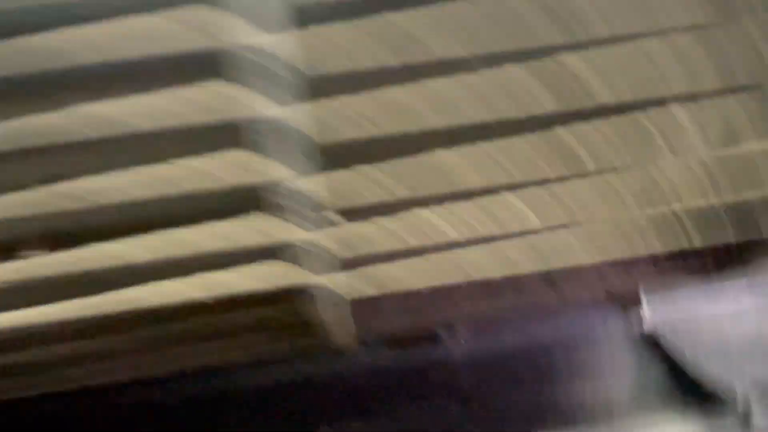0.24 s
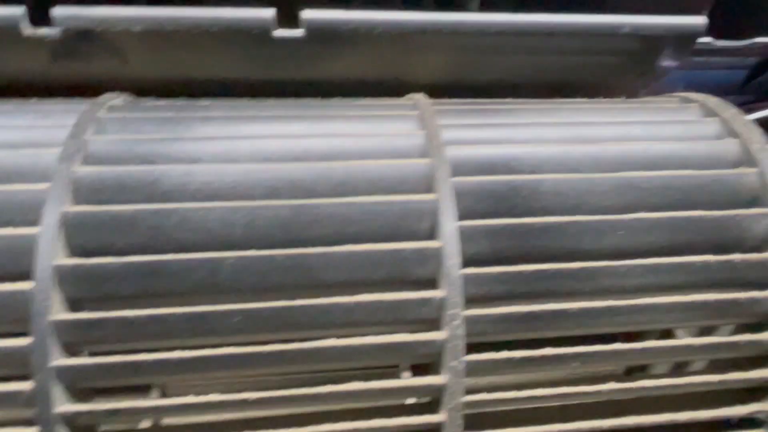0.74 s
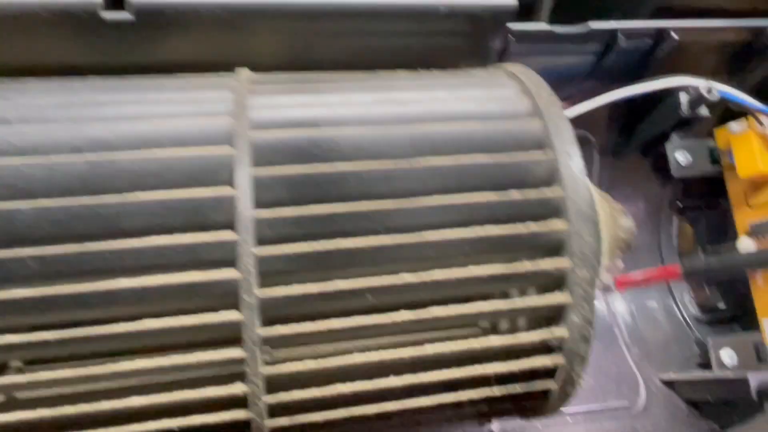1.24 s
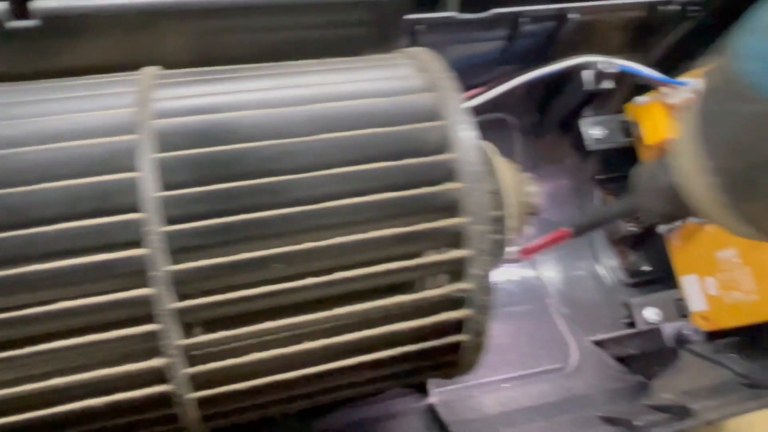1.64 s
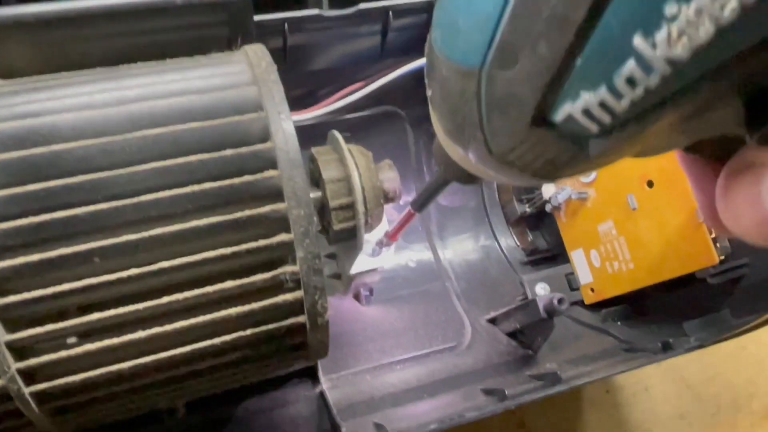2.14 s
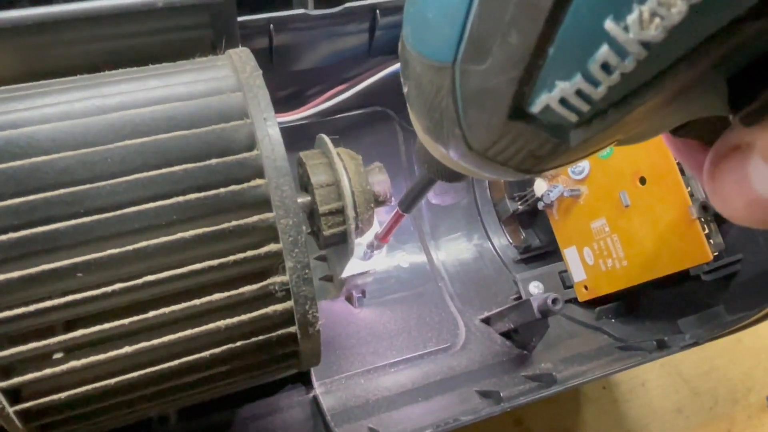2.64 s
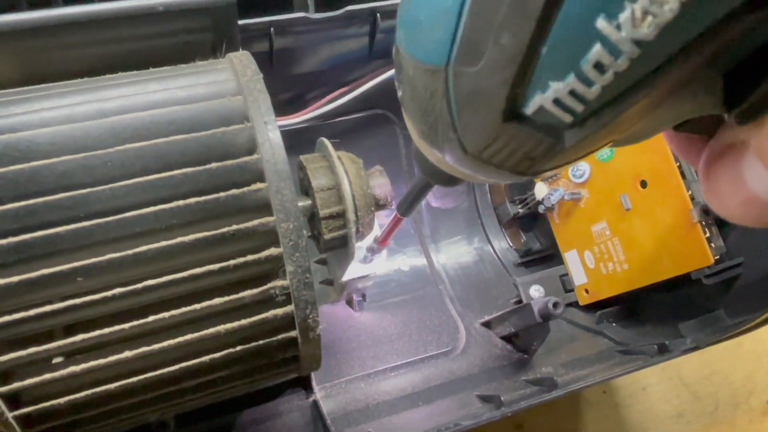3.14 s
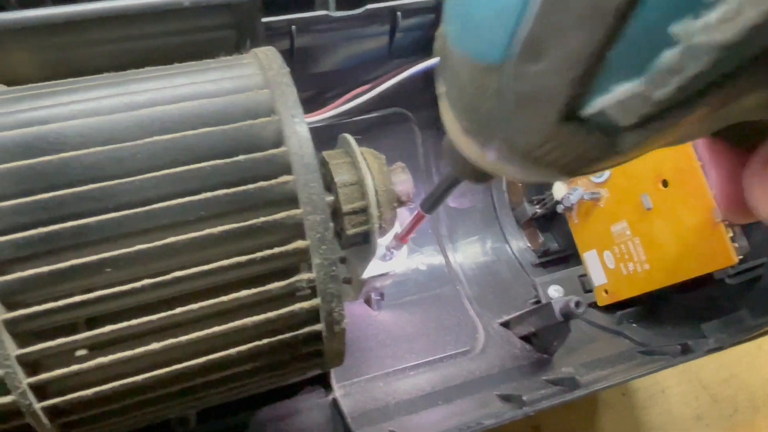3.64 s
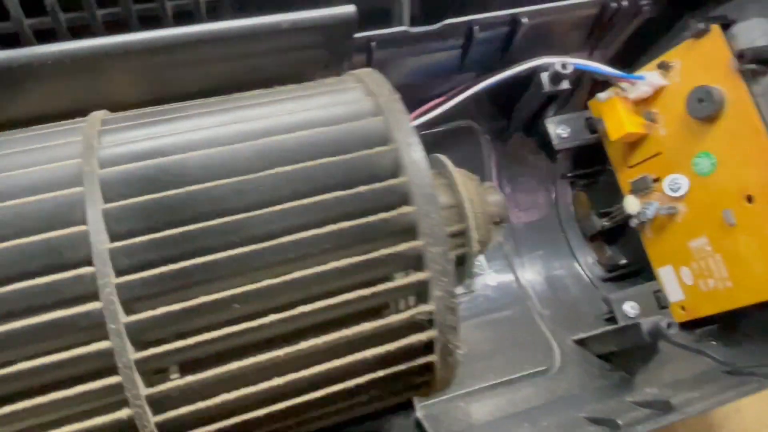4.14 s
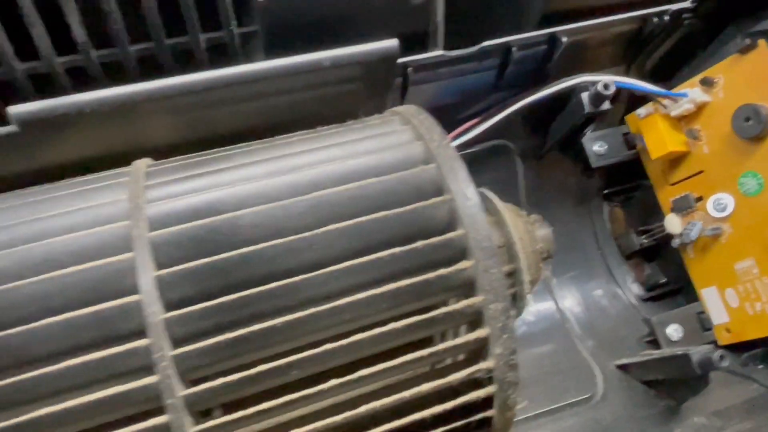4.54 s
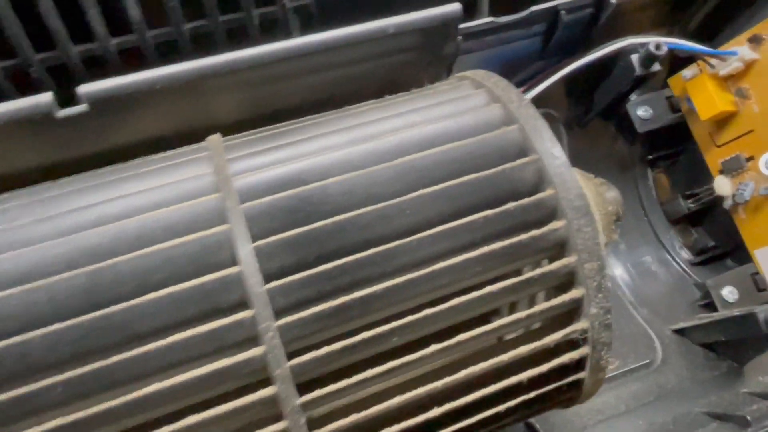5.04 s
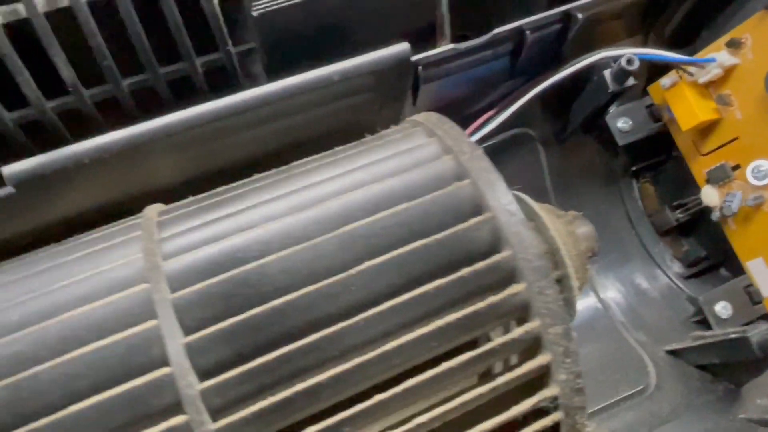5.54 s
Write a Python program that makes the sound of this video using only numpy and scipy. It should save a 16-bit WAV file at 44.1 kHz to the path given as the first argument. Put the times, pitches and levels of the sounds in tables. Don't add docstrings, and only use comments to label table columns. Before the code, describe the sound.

Small plastic taps, a half-second electric screwdriver whir with a sharp snap, then heavy clattering thuds as the tool is put down.

```python
import sys
import numpy as np
from scipy import signal
from scipy.fft import rfft, irfft, next_fast_len
from scipy.io import wavfile
from scipy.ndimage import uniform_filter1d, map_coordinates

SR = 44100
rng = np.random.default_rng(int(sys.argv[2]) if len(sys.argv) > 2 else 0)


def level_to_linear(level):
    exponent = np.asarray(level, float) / 20
    return 10 ** exponent


def transcribe(signal):
    frames = np.atleast_2d(signal).T
    limited = np.clip(frames, -1, 1)
    pcm = np.round(limited * 32767).astype(np.int16)
    wavfile.write(sys.argv[1], SR, pcm)


N = 255912

# [t/s, peak level/dB, hollow level/dB, bright level/dB]
TAPS = [(1.0384, -31, 0, -10.5), (1.0518, -29, 5.5, 0), (1.0797, -27, -7, 2.5), (1.14, -49, 10.5, -32),
        (1.1955, -42, -6, -2), (1.266, -37, -10, 4), (1.3039, -45, -1.5, -5), (1.3324, -35.5, 11.5, -13.5),
        (1.3544, -42.5, 12, -7), (1.4474, -51, 14.5, -27), (1.4552, -41.5, 5, -5), (1.494, -34.5, 14, -3),
        (1.511, -20.5, 4, 0), (1.5588, -39.5, 12.5, -2.5), (1.5973, -52.5, 17.5, -10),
        (1.6761, -67, 20, -12), (1.6911, -61.5, 20, -16)]
# [t/s, peak level/dB, hollow level/dB, bright level/dB]
SEATING = [(1.9005, -60.5, 14, 11), (1.992, -53.5, 14.5, -1), (2.4885, -75, 28, -6), (2.5133, -54, 10, -1),
           (2.5416, -54.5, 13, -8), (2.5907, -58, 12.5, -11), (2.6622, -51, 11.5, -6),
           (2.7144, -64.5, 17.5, -5), (2.8054, -58.5, 17, -12), (2.814, -42, 3.5, 1.5),
           (2.9553, -49, 2.5, 1), (2.9818, -30, 6.5, -13), (2.9926, -27, 5.5, 9)]
# [t/s, peak level/dB, hollow level/dB, bright level/dB]
JERKS = [
    (3.1537, -34, 11, 0),
    (3.1976, -41, 4, -6),
    (3.3187, -26, -8, -16),
]
# [t/s, peak level/dB, hollow level/dB, bright level/dB]
SNAPS = [
    (3.1925, -13, -3, 5.5),
    (3.439, -46, -2, 6),
]
# [t/s, peak level/dB, hollow level/dB, bright level/dB]
SKIPS = [
    (3.0263, -23.5, 3, -9),
    (3.119, -35, 0, -4),
    (3.16, -34, 1, 0),
    (3.171, -25, 12, 5),
    (3.204, -30, 0, 8),
    (3.269, -21.5, 5, 2.5),
    (3.338, -21, 1, 7),
]
# [t/s, peak level/dB, hollow level/dB, bright level/dB]
WITHDRAWAL = [(3.569, -50.5, 7, -4), (3.616, -51, 1, 3), (3.6274, -40, 10.5, 6), (3.6385, -33, -16, -3),
              (3.6605, -37.5, -1, 0), (3.693, -44, 12, 15), (3.703, -43, 12, -15), (3.7194, -47, 18.5, 5),
              (3.7514, -45.5, 16.5, -26), (3.9828, -51, 9, 1)]
# [t/s, peak level/dB, hollow level/dB, bright level/dB]
CLACKS = [(4.47, -20, 13.5, -1.5), (4.4817, -11.5, 9, -8), (4.4944, -15.5, -18, -5),
          (4.5144, -31.5, 13, -33), (4.6623, -42.5, 13.5, -27), (4.7762, -49, 25, -35),
          (4.7831, -22, 8, -16.5), (5.019, -15.5, 7.5, -4), (5.049, -27, 4, -9), (5.0665, -32, 6, -25),
          (5.0973, -19.5, 14.5, -2), (5.1077, -23, 18.5, -10), (5.1452, -16.5, 14.5, -3),
          (5.179, -41, 3, -14), (5.2125, -44.5, 24, -13)]
# [t/s, peak level/dB, hollow level/dB, bright level/dB]
BUZZ = [
    (4.786, -24.5, 3.5, -34),
    (5.11, -22, -23, -19),
]
# [f/Hz, width/Hz, level/dB]
HOUSING = [(655, 28, -1.5), (965, 76, 4.5), (1309, 58, 2.5), (2140, 1300, -7), (2654, 33, 3.5),
           (3270, 91, 4.5), (4710, 760, -3), (5427, 87, 12.5), (5870, 230, 1)]
# [f/Hz, width/Hz, level/dB]
TOOL = [(730, 210, 1.5), (1018, 39, 7.5), (1420, 130, 7), (2316, 350, -2), (2680, 206, -23), (3310, 790, 6),
        (5400, 1350, 8.5), (6600, 220, 4)]
# (t60/s, panel f/Hz)
WALL, SCREW_HEAD, THREAD = (0.029, 2910), (0.023, 2160), (0.089, 1860)
RIM, CATCH = (0.017, 2560), (0.015, 4000)
BENCH, BATTERY = (0.022, 1465), (0.016, 2010)

# [t/s, peak level/dB, ring f/Hz]
TICKS = [(1.14, -44, 2500), (1.2654, -32, 3400), (1.2658, -28.5, 5240), (1.333, -47, 3373),
         (1.447, -49, 2800), (1.516, -19, 1286), (2.542, -51.5, 2070), (3.154, -20.5, 2130),
         (3.1915, -21.5, 3630), (3.571, -45, 885), (3.618, -35, 4930), (3.642, -30.5, 2930),
         (3.66, -34, 2800), (3.705, -42, 2900), (4.705, -46, 2100), (5.035, -33, 3200),
         (5.051, -22.5, 2430), (5.066, -34, 3200), (5.106, -28, 5500), (5.124, -35, 2800),
         (5.136, -35, 2800), (5.178, -46, 4250), (5.208, -51, 4000), (5.229, -40.5, 3470),
         (5.621, -53, 5040), (3.1595, -35, 1080), (3.17, -24, 1090), (3.193, -22.5, 1280),
         (3.2, -21.5, 780), (5.2145, -31.5, 1540), (1.676, -46, 813), (3.627, -34.5, 688),
         (3.641, -35.5, 700), (3.721, -40, 990), (3.752, -33, 648), (5.391, -46.5, 1150),
         (5.445, -53, 1050), (5.472, -48, 1050), (5.66, -47.5, 1390)]
# [t/s, length/s, level/dB, dull above f/Hz]
SCRAPES = [(1.047, 0.075, -44, 1500), (1.071, 0.036, -51, 6000), (1.215, 0.013, -45.5, 3500),
           (1.341, 0.044, -46, 1600), (1.452, 0.051, -46, 3000), (1.515, 0.078, -36, 1600),
           (1.673, 0.022, -40.5, 1180), (3.549, 0.023, -45.5, 1280), (3.609, 0.053, -36, 2470),
           (3.694, 0.05, -34, 1490), (3.736, 0.036, -51, 1300), (4.474, 0.12, -34.5, 2330),
           (4.77, 0.025, -35, 1500), (4.798, .13, -44, 2560), (5.028, 0.05, -24, 2000),
           (5.126, 0.039, -29, 1200), (5.151, 0.07, -27, 1200), (5.209, 0.037, -29.5, 1520),
           (5.01, 0.016, -34, 1200), (1.32, .012, -52, 3000)]
# [t/s, peak level/dB, f/Hz, t60/s]
RINGS = [(1.056, -37.5, 178, 0.3), (1.055, -37, 956, 0.1), (1.057, -44, 1283, 0.065),
         (1.27, -57, 202, 0.075), (1.336, -47, 916, 0.11), (1.365, -50.5, 191, 0.18),
         (1.497, -32.5, 940, 0.09), (1.515, -40, 662, 0.12), (1.518, -44, 1010, 0.17),
         (1.56, -55, 984, 0.086), (1.685, -47, 708, 0.077), (4.452, -48.5, 940, 0.082),
         (4.48, -19.5, 1464, 0.049), (4.5, -26, 419, 0.16), (4.765, -36.5, 400, .08),
         (4.787, -25.5, 2145, 0.032), (4.885, -39, 401, 0.24), (5.022, -22, 816, 0.073),
         (5.021, -21, 630, 0.067), (5.06, -37, 1670, 0.057), (5.145, -23, 1525, 0.044),
         (5.222, -24, 443, 0.031), (5.308, -45, 198, .06), (5.445, -37.5, 308, 0.069),
         (5.46, -38.5, 402, 0.048), (4.494, -25, 149.5, 0.1), (5.564, -40, 378, 0.074),
         (5.662, -34.5, 420, 0.038), (5.71, -36.5, 194, 0.064), (4.81, -51, 2080, 0.26),
         (4.815, -53, 2370, .15)]

# [t/s, shaft f/Hz, gear load level/dB]
MOTOR = [
    (3.0, 203.5, -43.5),
    (3.036, 197.7, -39),
    (3.09, 192.4, -35),
    (3.15, 183.7, -30),
    (3.175, 180.2, -34.5),
    (3.21, 185.3, -35),
    (3.262, 192, -34.5),
    (3.32, 194.7, -31.5),
    (3.385, 199.6, -32.5),
]
SHAFT_ORDERS = [1, 1.3, 2, 3, 4, 4.5, 5, 5.5, 6, 7, 11]
# [mid level/dB, side level/dB]
ORDER_LEVELS = [(-7.5, -4.5), (-13, -24), (3.5, -3.5), (-9.5, 1), (-4.5, -3), (-16, -18), (-1.5, -14),
                (-16, -16), (0, -18), (-10.5, -8), (-2, -23)]
# [f/Hz, width/Hz, level/dB]
GEARS = [(770, 103, 0), (1085, 310, -1), (1600, 125, -2.5), (2104, 186, 2.5), (2800, 144, 1)]
# [f/Hz, level/dB per Hz]
BRUSHES = [(2500, -14), (4200, 3), (5000, -4.5), (6500, -11.5), (9500, -6), (13000, -25), (13500, -34),
           (15900, -44)]

# [t/s, peak level/dB, f/Hz]
HAND_KNOCKS = [(2.22, -53.5, 168), (3.63, -42, 640), (3.712, -42, 172), (3.76, -37, 629), (4.47, -18, 416),
               (4.489, -14, 432), (4.662, -24.5, 310), (4.688, -30, 380), (4.704, -24.5, 360),
               (4.784, -15, 357), (5.019, -4.5, 394.5), (5.031, -16.5, 387), (5.097, -14, 445),
               (5.179, -28.5, 214), (5.325, -28, 257), (5.391, -24.5, 403), (5.549, -36, 230),
               (5.659, -31, 294)]
# [t/s, peak level/dB, f/Hz]
FREE_KNOCKS = [
    (1.059, -35.5, 174.4),
    (4.82, -38.5, 424.6),
    (5.115, -19, 408.6),
    (5.142, -15.5, 417),
    (5.21, -23, 382.7),
    (5.613, -45.5, 375),
]
# [t/s, peak level/dB, f/Hz, t60/s]
BOOMS = [(1.079, -30.5, 71.8, 0.38), (1.367, -40.5, 76.5, 0.29), (1.535, -27, 70.7, 0.22),
         (1.61, -30.5, 63.1, 0.22), (1.92, -57, 72, .3), (2.089, -49, 56.6, 0.69), (2.4, -61.5, 75.4, .2),
         (2.557, -48.5, 68.5, 0.2), (2.975, -49, 71, 0.26), (3.203, -39, 71, 0.45), (3.417, -41, 73, 0.17),
         (3.567, -39.5, 73.8, 1), (3.725, -27.5, 73.8, 0.34), (3.991, -50, 59.7, 0.13),
         (4.501, -14, 67.3, 0.17), (4.681, -18, 66.7, 0.44), (4.797, -19.5, 100, 0.07),
         (5.039, -7.5, 64.8, 0.18), (5.186, -9, 68, 0.24), (5.332, -22, 70.6, 0.24),
         (5.451, -22.5, 84.8, 0.49), (5.608, -22.5, 76.3, 0.33), (5.717, -26, 91.7, 0.27)]

# [t/s, effort level/dB]
GRIP = [(0, -66), (.12, -69.5), (.3, -59), (.45, -67.5), (.7, -78), (1.04, -76), (1.1, -66), (1.3, -68),
        (1.58, -51.5), (1.75, -68), (2.45, -67.5), (2.9, -69.5), (3.5, -60.5), (3.73, -53), (3.84, -64),
        (4.4, -62), (5.7, -55.5), (5.77, -60)]
# [t/s, speed level/dB]
SLEEVE = [(0.05, -72), (.36, -69), (.7, -82.5), (1.0, -79), (1.12, -72.5), (1.3, -73.5), (1.58, -67),
          (1.97, -69), (2.12, -76.5), (3.0, -78), (3.55, -71), (3.95, -66.5), (4.4, -62.5), (5.0, -68),
          (5.28, -65.5), (5.48, -57), (5.58, -65.5), (5.75, -55.5)]
# [t/s, rise level/dB, half length/s]
SWIPES = [
    (4.288, 11.5, 0.13),
    (5.036, 14, 0.056),
    (5.131, 13, .02),
    (5.176, 18, 0.11),
    (5.323, 8.5, 0.06),
    (5.736, 7, 0.046),
]
# [f/Hz, level/dB per Hz]
RUMBLE = [(12, -47), (20, -26.5), (36, -2), (59, -2.5), (82, -1.5), (130, -18), (170, -12.5), (290, -120)]
# [f/Hz, level/dB per Hz]
HANDLING = [(65, -33), (110, 4.5), (258, -3.5), (389, -5.5), (614, -15.5), (700, -14.5), (910, -16),
            (1540, -120)]
# [f/Hz, level/dB per Hz]
RUB = [(350, -21), (600, -5.5), (987, -1.5), (1630, -4), (3200, -7.5), (4160, -13), (7040, -120)]
# [f/Hz, level/dB per Hz]
RUSTLE = [(2000, -39), (2800, -3), (5200, 3), (7500, -2), (9700, -4), (13300, -21), (15800, -29)]
# (level at rest/dB, growth, share of the aftershake/dB)
TREMBLE, FUMBLE = (-68, 0.88, -15.5), (-72.5, 1.52, -29.5)
DRAG, SWISH = (-69, 1, -71), (-74, 1.08, -91)

# [f/Hz, t60/s]
ROOM = [(100, 0.46), (1000, 0.26), (6000, 0.303)]
# [f/Hz, side minus mid level/dB]
WIDE_TAPS = [(60, -34), (150, -3.5), (380, -9.5), (950, -2), (2380, 1), (5980, 1.5), (12000, 17.5),
             (15000, 0)]
# [f/Hz, side minus mid level/dB]
WIDE_MOTOR = [(60, -4), (150, -6), (380, 10.5), (950, -0.5), (2380, -2), (5980, 6), (15000, 11.5)]
# [f/Hz, side minus mid level/dB]
WIDE_AIR = [(60, -7.5), (180, -5.5), (550, 3.5), (1650, 4.5), (4970, 0.5), (13500, 12), (15000, 5.5)]
# [f/Hz, level/dB]
SHARED_DIP = [(6800, -0.5), (7000, -7.5), (8100, -16), (8300, -3), (13300, 10), (13700, -8)]
# [f/Hz, level/dB]
DIFFERENCE_DIP = [(8400, -3.5), (10000, -42.5), (10500, -54), (12700, -59), (13500, 9)]
# [f/Hz, level/dB]
MICROPHONE = [(33, -13), (55, -0.5), (15900, -1), (16400, -43)]


def contacts(rows, spot, body, gain_db, rattle_db, echo_db, echo_s, hollow_slower, damping):
    track, t = np.zeros((2, N)), np.arange(SR // 6) / SR
    t60, panel_hz = spot
    life = max(t60, 0.004)
    for s, db, hollow_db, bright_db in rows:
        bounces = np.repeat(rng.standard_normal(len(t) // 40 + 1), 40)[:len(t)]
        rattle = level_to_linear(rattle_db * bounces)

        def burst(life):
            decay = rattle * level_to_linear(-60 * t / life) + level_to_linear(echo_db - 60 * t / echo_s)
            rise = (1 - np.exp(-t / (0.034 * life))) ** 2
            return rng.standard_normal((2, len(t))) * decay * rise

        modes = [(c * (1 + rng.normal(0, 0.028)), w, level + rng.normal(0, 0.4)) for c, w, level in body]
        modes.append((panel_hz, 60 + damping * panel_hz, 3.5))
        upper = [(1200, -8.5), (2400, 21.5), (4500, 8.5),
                 (6000, bright_db + 8.0), (10000, bright_db + 8.5), (16000, bright_db - 20.0)]
        lower = [(300, -17.5), (620, -5.0), (1500, -7.0), (2300, -20.5), (5000, -57)]
        crisp = ports(burst(life), lambda f: (resonances(modes, f) + 0.62) * level_to_linear(along(upper, f)),
                      WIDE_TAPS, alike=0.63, dip=0.5)
        hollow = ports(burst(hollow_slower * life),
                       lambda f: (resonances(modes, f) + 0.18) * level_to_linear(along(lower, f)),
                       WIDE_TAPS, alike=0.81, dip=0)
        hit = crisp / np.abs(crisp[0]).max() + level_to_linear(hollow_db - 9.0) * hollow / np.abs(hollow[0]).max()
        add(track, s - 0.0013, left_right(level_to_linear(db + gain_db) * hit, rng.normal(0, 0.48)))
    return track


def ticks():
    track, t = np.zeros((2, N)), np.arange(SR // 20) / SR
    for s, db, hz in TICKS:
        phase = np.array([[0], [rng.uniform(0, 2 * np.pi)]])
        ring_t60 = min(38 / hz, 0.024)
        ring = np.sin(2 * np.pi * hz * t + phase) * level_to_linear(-60 * t / ring_t60)
        crack = rng.standard_normal((2, len(t))) * level_to_linear(-7.5 - 60 * t / 0.0033)
        pair = ports(ring + crack, lambda f: 1 / (1 + (500 / (f + 1)) ** 4) / (1 + (f / (3.1 * hz)) ** 4),
                     WIDE_TAPS, alike=1.0, dip=0.4)
        add(track, s, left_right(level_to_linear(db) * pair / np.abs(pair[0]).max(), pan_db=-1.5))
    return track


def scrapes():
    track = np.zeros((2, N))
    for s, length, db, top_hz in SCRAPES:
        u = np.arange(SR // 5) / SR / max(length, 0.005)
        stroke = np.clip(u / 0.076, 0, 1) * level_to_linear(-8 * u - 49 * np.clip(u - 1, 0, None))
        grit = level_to_linear(3.1 * np.repeat(rng.standard_normal(len(u) // 90 + 1), 90)[:len(u)])

        def colour(f):
            thin = 1 + (473 / (f + 1)) ** 4
            return (0.21 * resonances(HOUSING, f) + 1) / (1 + (f / top_hz) ** 3) / thin

        friction = rng.standard_normal((2, len(u))) * grit * stroke
        pair = ports(friction, colour, WIDE_TAPS, alike=0.55, dip=0.26)
        pair = level_to_linear(db - 14.0) * pair / np.abs(pair[0]).mean() * stroke.mean()
        add(track, s, left_right(pair, pan_db=0.0))
    return track


def rings():
    track, t = np.zeros((2, N)), np.arange(SR // 5) / SR
    for s, db, hz, t60 in RINGS:
        steps = uniform_filter1d(rng.standard_normal((2, len(t))), size=60)
        drift = 0.032 * np.sqrt(hz / 500) * np.cumsum(steps, axis=1)
        swell = level_to_linear(-60 * t / max(t60, 0.01)) * (1 - np.exp(-t * hz / 1.2))
        ring = np.sin(2 * np.pi * hz * t + drift) * swell
        pair = ports(ring, lambda f: 1, WIDE_TAPS, alike=0.6, dip=0)
        add(track, s, left_right(level_to_linear(db) * pair / np.abs(pair[0]).max(), pan_db=-1.5))
    return track


def motor():
    run = slice(29 * SR // 10, 35 * SR // 10)
    shaft_hz, gear_db = np.array(curves(MOTOR))[:, run]
    t = np.arange(N)[run] / SR
    since = t - MOTOR[0][0]
    sag_hz = 199 - shaft_hz
    low_db = 10 * since - 0.7 * np.clip(sag_hz, 0, 12)
    strain_db = 0.65 * (sag_hz - 8)
    hiss_db = -36 + 0.3638 * sag_hz - 7.5 * np.clip(1 - since / 0.039, 0, 1)
    running = np.interp(t, [2.98, 2.995, 3.4, 3.428, 3.46], [0.0057, 0.9, 0.91, 0.15, 0.0099])
    turn = 2 * np.pi * np.cumsum(shaft_hz * (1 + 0.00091 * wobble(60.6, run))) / SR
    freed = np.clip((t - 3.25) / 0.03, 0, 1)

    mid = side = 0
    for k, (mid_db, side_db) in zip(SHAFT_ORDERS, ORDER_LEVELS):
        held_db = -14 * ((1 - freed) * (k == 1) + freed * (1 < k < 2))
        order_db = mid_db + held_db + (k <= 2) * low_db + (k == 6) * strain_db
        order_db = order_db + (0.8 + 1.7 * (k > 2)) * wobble(27.78, run)
        mid = mid + level_to_linear(order_db) * np.sin(k * turn + k * k)
        order_db = side_db + (k <= 5) * 0.93 * low_db + 1.5 * wobble(24.7, run)
        side = side + level_to_linear(order_db) * np.cos(k * turn + k)
    coast = level_to_linear(-10 - 60 * np.clip(t - 3.41, 0, None) / 0.21)
    gate = np.clip((t - 2.98) / 0.015, 0, 1) * np.maximum((3.415 - t) / 0.015, coast).clip(0, 1)
    whine = level_to_linear(-39) * gate * left_right([mid, side], pan_db=-2.0)

    throb = level_to_linear(1.44 * np.cos(turn) + 0.41 * np.cos(turn / 2))
    gears = rush(lambda f: resonances(GEARS, f) + 0.14 * (f > 450) * (f < 3600), WIDE_MOTOR,
                 patchy_db=1.5, pan_db=0.5, alike=0.94, count=len(t))
    brushes = rush(lambda f: level_to_linear(along(BRUSHES, f)), WIDE_MOTOR,
                   patchy_db=1.5, pan_db=-0.5, alike=1.0, count=len(t))
    stutter = level_to_linear(0.64 * wobble(150, run))
    noise = level_to_linear(gear_db + 0.5) * gears + level_to_linear(hiss_db - 1.0) * brushes
    track = np.zeros((2, N))
    track[:, run] = 0.75 * whine + running * throb * stutter * noise
    return track


def knocks():
    track, t = np.zeros((2, N)), np.arange(SR // 5) / SR
    ratios = np.array([[0.56], [0.8], [1], [1.24], [1.72]])
    level_db = np.array([[-12], [-19], [0], [-11], [-22]])
    damped_s, free_s = 0.04, 0.16
    blows = [(*row, damped_s) for row in HAND_KNOCKS] + [(*row, free_s) for row in FREE_KNOCKS]
    for s, db, hz, t60 in blows:
        steps = uniform_filter1d(rng.standard_normal((5, len(t))), size=40)
        drift = 0.075 * np.sqrt(t60 / damped_s) * hz / 400 * np.cumsum(steps, axis=1)
        phase = rng.uniform(0, 2 * np.pi, (2, 5, 1)) + drift
        mode_hz = hz * ratios * (1 + rng.normal(0, 0.022, (5, 1)))
        tones = np.sin(2 * np.pi * mode_hz * t + phase)
        fade_db = -60 * t * ratios ** 0.65 / max(t60, 0.01)
        ring = (level_to_linear(level_db + rng.normal(0, 0.45, (2, 5, 1)) + fade_db) * tones).sum(axis=1)
        ring = ports(ring * (1 - np.exp(-t / 0.003)), lambda f: 1, WIDE_TAPS, alike=0.34, dip=0)
        add(track, s, left_right(level_to_linear(db + 2.04) * ring / np.abs(ring[0]).max(), pan_db=1.7))
    return track


def booms():
    track, t = np.zeros((2, N)), np.arange(SR // 2) / SR
    lag_s = np.array([[0.00024], [0]])
    tilt_db = np.array([[1.5], [-1.7]])
    for s, db, hz, t60 in BOOMS:
        turn = 2 * np.pi * hz * (t - lag_s)
        swing = np.sin(turn) + level_to_linear(-12.0) * np.sin(1.5 * turn) + level_to_linear(-19.0) * np.sin(1.9 * turn)
        swing *= level_to_linear(-60 * t / max(t60, 0.05)) * (1 - np.exp(-t / 0.013))
        add(track, s - 0.008, level_to_linear(db) * swing / np.abs(swing).max() * level_to_linear(tilt_db))
    return track


def aftershake():
    jolts = np.array(BOOMS)
    since = np.clip(np.arange(0, N, 64) / SR - jolts[:, :1], 0, None)
    each = level_to_linear(jolts[:, 1:2] - 60 * since / 1) * (1 - np.exp(-since / 0.06))
    return np.repeat(np.sqrt((each ** 2).sum(axis=0)), 64)[:N]


def surroundings():
    (effort_db,), (speed_db,), shake = curves(GRIP), curves(SLEEVE), aftershake()
    levels = []
    for control_db, (rest_db, grows, shake_db) in ((effort_db, TREMBLE), (effort_db, FUMBLE),
                                                   (speed_db, DRAG), (speed_db, SWISH)):
        moved = level_to_linear(rest_db + grows * (control_db + 70))
        levels.append(np.hypot(moved, level_to_linear(shake_db) * shake))
    t = np.arange(N) / SR
    swipe_db = sum(db * np.clip(1 - np.abs(t - s) / half, 0, 1) for s, db, half in SWIPES)
    levels[3] = np.hypot(levels[3] * level_to_linear(swipe_db), level_to_linear(-84.5))
    grip = wobble(15.0)
    lumps_db, patches_db = (0.85, 0.57, 1.28, 0.35), (3.28, 4.5, 1.2, 1.1)
    air = 0
    for level, points, lump_db, patchy_db in zip(levels, (RUMBLE, HANDLING, RUB, RUSTLE), lumps_db, patches_db):
        noise = rush(lambda f: level_to_linear(along(points, f)), WIDE_AIR, patchy_db, pan_db=0, alike=0.33)
        air = air + level * level_to_linear(lump_db * grip) * noise
    return air - filtered(air.mean(axis=0), lambda f: (f > 7150) * (f < 8250))


def room(x):
    hz, t, z = signal.stft(rng.standard_normal((2, SR // 2)), SR, nperseg=256)
    tail = signal.istft(z * level_to_linear(-60 * t / along(ROOM, hz)[:, None]), SR, nperseg=256)[1]
    late = np.pad(x, ((0, 0), (200, 0)))
    return signal.fftconvolve(late, tail / np.linalg.norm(tail[0]), axes=1)[:, :N]


def rush(response, wide, patchy_db, pan_db, alike, count=N):
    z = signal.stft(rng.standard_normal((2, count)), nperseg=512)[2]
    field = uniform_filter1d(uniform_filter1d(rng.standard_normal(z.shape[1:]), 6, 0), 8, 1)
    noise = signal.istft(z * level_to_linear(patchy_db * unit(field)), nperseg=512)[1][:, :count]
    pair = ports(noise, response, wide, alike, dip=0.62)
    return left_right(pair / pair[0].std(), pan_db)


def ports(pair, response, wide, alike, dip):
    share = np.clip(alike, 0, 1)
    pair = np.array([pair[0], share * pair[0] + np.sqrt(1 - share ** 2) * pair[1]])
    turned = np.exp([[0], [-1.15j]])

    def heard(f):
        shared_db = dip * along(SHARED_DIP, f)
        difference_db = along(wide, f) + dip * along(DIFFERENCE_DIP, f)
        return response(f) * level_to_linear([shared_db, difference_db]) * turned

    return filtered(pair, heard)


def left_right(pair, pan_db):
    return np.array([pair[0] + pair[1], pair[0] - pair[1]]) * level_to_linear(np.array([[pan_db / 2], [-pan_db / 2]]))


def resonances(peaks, f):
    return sum((-1) ** k * level_to_linear(db) * 1j * f * w / (c * c - f * f + 1j * f * w)
               for k, (c, w, db) in enumerate(peaks))


def filtered(x, response):
    n = x.shape[-1]
    m = next_fast_len(n + 4096)
    return irfft(rfft(x, m) * response(np.fft.rfftfreq(m, 1 / SR)), m)[..., :n]


def along(points, hz):
    f, v = np.transpose(points)
    return np.interp(np.log(hz + 1), np.log(f + 1), v)


def curves(rows):
    s, *cols = np.transpose(rows)
    return [np.interp(np.arange(N) / SR, s, c) for c in cols]


def wobble(rate, span=slice(None)):
    knots = rng.standard_normal(int(N * rate / SR) + 4)
    return map_coordinates(knots, [np.arange(N)[span] * rate / SR])


def unit(x):
    return x / np.sqrt(np.mean(x ** 2) + 1e-20)


def add(track, s, sound):
    part = track[:, round(s * SR):][:, :sound.shape[1]]
    part += sound[:, :part.shape[1]]


def scene():
    mix = np.zeros((2, N))
    for rows, spot in ((TAPS, WALL), (SEATING, SCREW_HEAD), (JERKS, THREAD), (WITHDRAWAL, RIM), (SNAPS, CATCH)):
        mix += contacts(rows, spot, HOUSING, gain_db=1.27, rattle_db=6.0, echo_db=-35.0, echo_s=0.27,
                        hollow_slower=2.43, damping=0.086)
    mix += contacts(SKIPS, CATCH, HOUSING, gain_db=-1.5, rattle_db=16.5, echo_db=-36, echo_s=0.1,
                    hollow_slower=3.0, damping=0.093)
    mix += contacts(CLACKS, BENCH, TOOL, gain_db=-0.66, rattle_db=6, echo_db=-23.0, echo_s=0.17,
                    hollow_slower=0.99, damping=0.1)
    buzz = contacts(BUZZ, BATTERY, TOOL[2:4], gain_db=8.5, rattle_db=21.5, echo_db=-22, echo_s=0.42,
                    hollow_slower=0.91, damping=0.045)
    mix += filtered(buzz, lambda f: 1 / (1 + (f / 2700) ** 8))
    mix += ticks() + scrapes() + rings() + motor()
    thuds = knocks()
    mix += thuds + level_to_linear(-10.5) * room(thuds)
    mix += booms() + surroundings()
    whir = slice(302 * SR // 100, 34 * SR // 10)
    mix[:, whir] -= filtered(mix[:, whir].mean(axis=0), lambda f: (f > 6900) * (f < 8200))
    return mix


def low_pass(x):
    return signal.sosfilt(signal.butter(12, 16460, fs=SR, output="sos"), x)


def record(dry):
    pair = filtered(dry, lambda f: level_to_linear(along(MICROPHONE, f)))
    ceiling = 1.05
    finished = pair / (1 + (pair / ceiling) ** 6) ** (1 / 6)
    return low_pass(finished)


dry = scene()
out = record(dry)
transcribe(out)
```